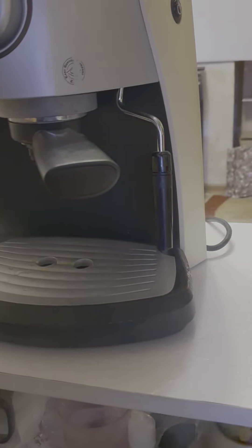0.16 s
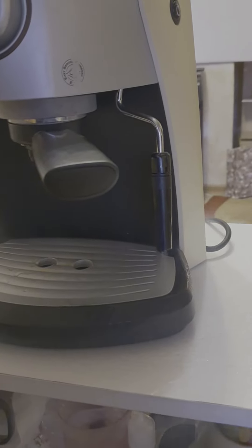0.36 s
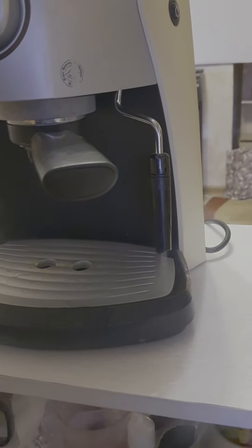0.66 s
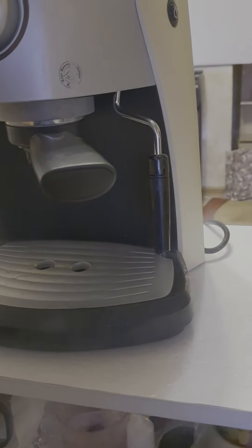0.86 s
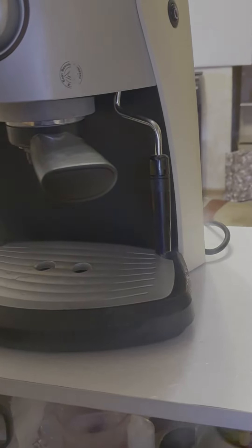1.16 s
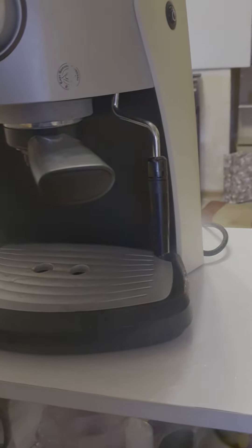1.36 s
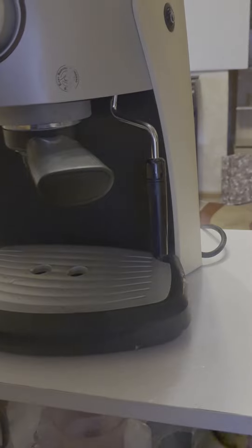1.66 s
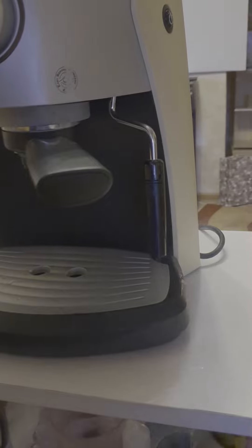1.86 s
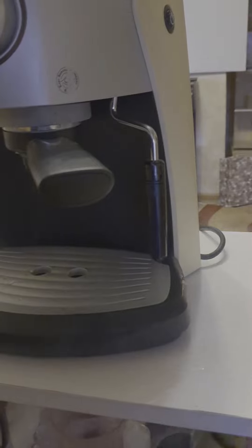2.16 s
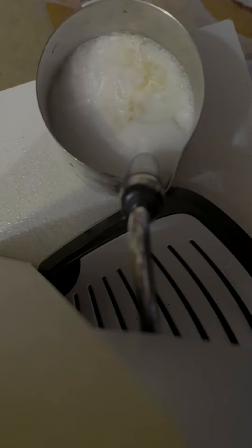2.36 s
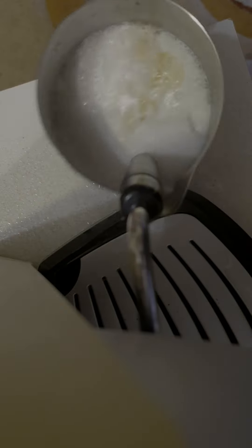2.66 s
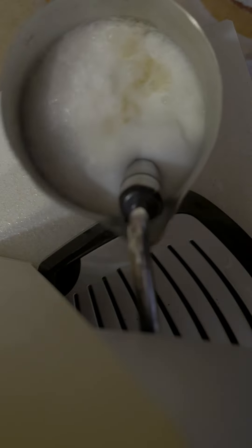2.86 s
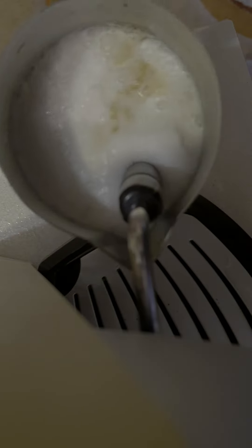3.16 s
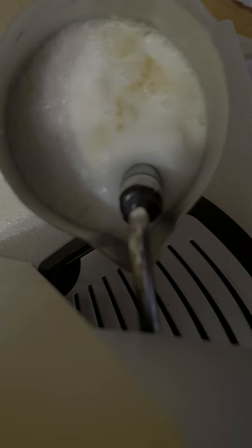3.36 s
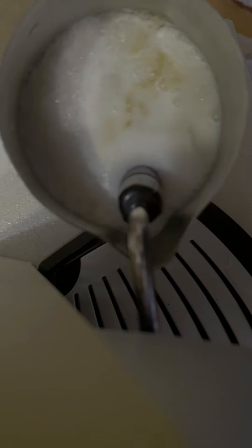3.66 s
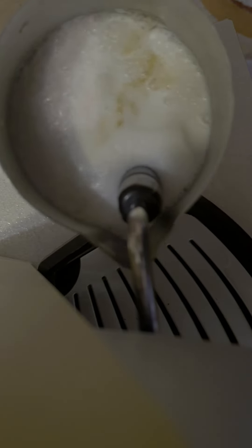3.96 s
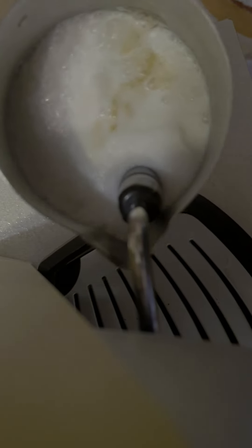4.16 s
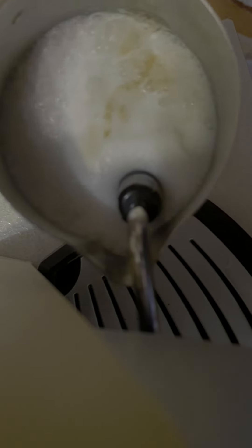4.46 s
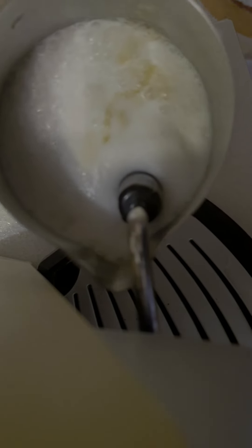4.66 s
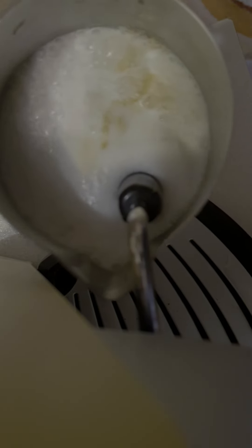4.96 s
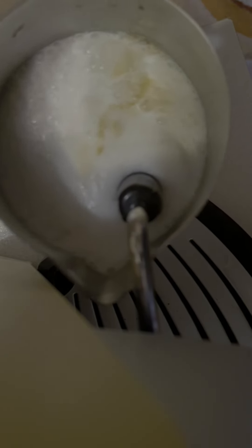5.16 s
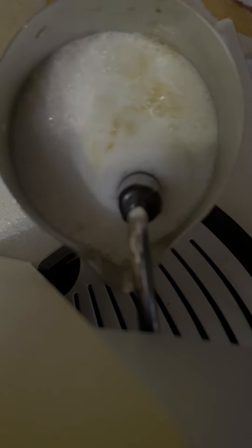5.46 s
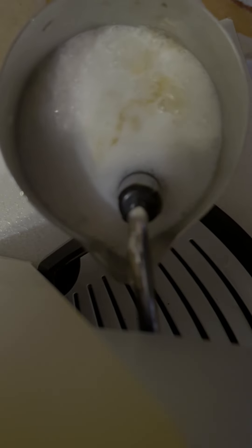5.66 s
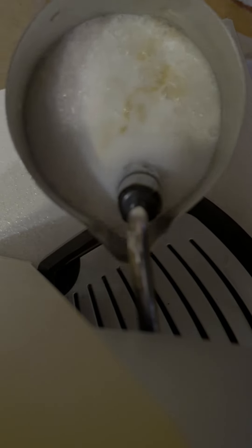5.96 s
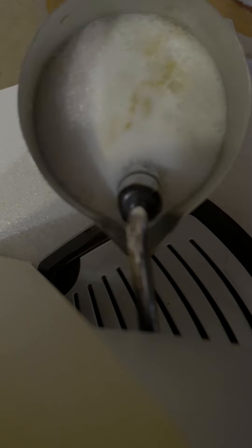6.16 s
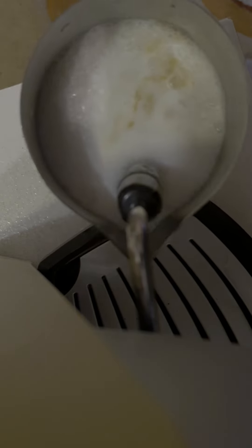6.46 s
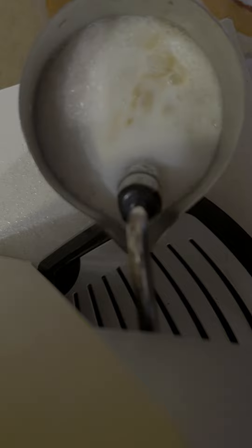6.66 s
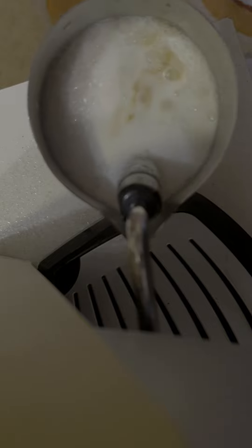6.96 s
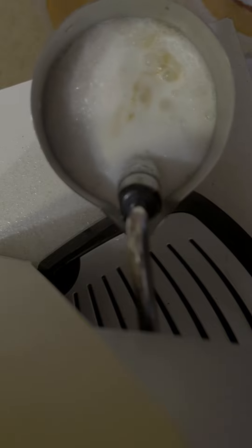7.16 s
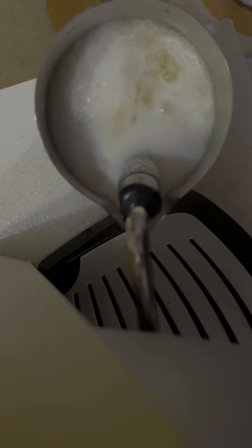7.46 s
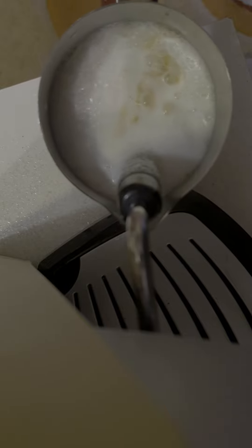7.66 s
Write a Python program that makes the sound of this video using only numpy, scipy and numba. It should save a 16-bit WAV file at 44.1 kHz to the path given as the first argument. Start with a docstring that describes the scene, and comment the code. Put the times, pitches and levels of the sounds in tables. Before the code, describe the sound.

In a home kitchen, an espresso machine's steam wand blows a loud, sputtering hiss into the air, then breaks off suddenly. A metal pitcher scuffs and knocks softly into place. The steam starts again inside the milk with a short tearing slurp and a few high squeaks, then settles into a hollow, bubbling rumble with irregular pops and faint fizz, all heard close up.

```python
"""Steaming milk in a home kitchen.

An espresso machine's steam wand blows a turbulent jet into open air, and the sound breaks off.
Then a steel pitcher is knocked into place and the valve opens. The tip tears air into the surface,
squeaks a few times and sinks, while condensing steam bubbles collapse in the milk with a hollow rumble."""
import sys
import numpy as np
from scipy import signal
from scipy.fft import rfft, irfft
from scipy.io import wavfile
from numba import njit

SR = 44100
rng = np.random.default_rng(int(sys.argv[2]) if len(sys.argv) > 2 else 0)


def file_out(sig):
    """Save sig as 16-bit WAV at sys.argv[1]."""
    # one column per channel
    cols = np.atleast_2d(sig).T
    # limit, then scale
    lim = np.clip(cols, -1, 1)
    pcm = np.round(lim * 32767).astype(np.int16)
    wavfile.write(sys.argv[1], SR, pcm)


N = 344862
T = np.arange(N) / SR
HZ = np.maximum(np.fft.rfftfreq(N, 1 / SR), 1)
JET_END_S, PITCHER_SCENE_S, VALVE_S = 2.272, 2.388, 3.45
TEAR_S, TEAR_LENGTH_S, SINK_S = 3.655, 0.43, 4.3

# Implosions of the largest steam bubbles: start_s, level_db, pitch_hz
COLLAPSES = [(3.487, -5.5, 965), (3.53, -17, 1050), (3.576, -16, 452), (3.598, -13.5, 780),
             (3.641, -13.5, 470), (4.365, -12, 700), (4.513, -7, 1034), (4.586, -5, 631), (4.665, -5, 678),
             (4.721, -8, 845), (4.961, -5, 850), (4.999, -5.5, 777), (5.098, -13, 840), (5.19, -3, 823),
             (5.476, -5, 814), (5.514, -4.5, 1000), (5.535, -3, 810), (5.597, -15, 760), (5.651, -17, 760),
             (5.71, -11.5, 723), (5.998, -5.5, 1097), (6.162, -8.5, 980), (6.25, -13, 810),
             (6.289, -5.5, 870), (6.298, -5.5, 965), (6.615, -11, 935), (7.234, -14, 707),
             (7.79, -17.5, 530)]


def amp(db):
    """Decibels to amplitude ratio."""
    return 10 ** (np.asarray(db) / 20)


def rms_one(x):
    """Normalise to unit rms."""
    return x / np.sqrt(np.mean(x ** 2) + 1e-20)


def at_hz(points):
    """Interpolate a table over log frequency at every bin."""
    hz, value = np.transpose(points)
    return np.interp(np.log(HZ), np.log(np.maximum(hz, 1)), value)


def drift(rate_hz):
    """Random modulation: low-passed noise of unit spread."""
    r = np.exp(-80 * np.pi * rate_hz / SR)
    slow = signal.lfilter([1], [1, -2 * r, r * r], rng.standard_normal(N // 40 + 2002))[2000:]
    return np.interp(np.arange(N) / 40, np.arange(len(slow)), rms_one(slow))


def coloured(x, gain):
    """Spectral shaping to unit rms."""
    return rms_one(irfft(rfft(x) * gain, N))


def lumpy_noise(spread_db, rate_hz):
    """White noise under random amplitude modulation."""
    return rng.standard_normal(N) * amp(spread_db * drift(rate_hz))


def highpass(x, hz):
    """Second-order roll-off below hz."""
    return signal.sosfilt(signal.butter(2, hz, "high", fs=SR, output="sos"), x)


def burst(start_s, length_s, attack_s, t60_s):
    """Envelope: linear rise, hold, exponential decay."""
    decay = amp(-60 * np.maximum(T - start_s - length_s, 0) / t60_s)
    return np.clip((T - start_s) / attack_s, 0, 1) * decay


def ring(drive, hz, t60_s):
    """Damped resonator: a unit impulse starts a sine of height 1."""
    r, w = amp(-60 / (t60_s * SR)), 2 * np.pi * hz / SR
    return signal.lfilter([0, np.sin(w)], [1, -2 * r * np.cos(w), r * r], drive + 1e-18)


@njit
def moving_ring(x, cos_w, r):
    """Two-pole resonator with a moving centre frequency."""
    y = np.zeros(len(x))
    for i in range(2, len(x)):
        y[i] = x[i] - x[i - 2] + 2 * r * cos_w[i] * y[i - 1] - r * r * y[i - 2]
    return y


def stereo_field(x, phase, balance, coherence):
    """Direct and diffuse sound at two microphone ports; the reflections shift as the microphone sways."""
    hz, lead = np.transpose(phase)
    share = np.clip(at_hz(coherence), 0, 1)
    bands_hz = np.arange(0, SR, 60)
    lags_s = 0.014 * rng.random((4, len(bands_hz)))   # each band returns with its own delay
    turn = np.cumsum([np.interp(HZ, bands_hz, lag) for lag in lags_s], axis=1) * 2 * np.pi * SR / N
    scatter = np.exp(-1j * turn).reshape(2, 2, -1)
    spectrum = rfft(x) * amp(at_hz(balance) * [[.5], [-.5]])
    port_phase = [np.ones(len(HZ)), np.exp(-1j * np.interp(HZ, hz, lead))]
    direct = irfft(spectrum * np.sqrt(share) * port_phase, N)
    here, there = irfft(spectrum * np.sqrt(1 - share) * scatter, N)
    sway = 3.02 * np.array([drift(3.3), drift(4.26)])
    return direct + np.cos(sway) * here + np.sin(sway) * there


def steam_jet():
    """Turbulent noise filtered by cavity resonances; water drops make the middle range sputter."""
    # Jet spectrum: frequency_hz, level_db
    colour = [(40, -47.5), (236, -18.5), (399, -17), (452, -21), (625, -8), (1500, -4.5), (2940, -1.5),
              (3250, -7.5), (4730, -1.5), (5780, -9), (8410, -7.5), (11900, -1.5), (15700, -7.5)]
    # Nozzle and drip tray resonances: centre_hz, width_hz, level_db
    cavities = [(1790, 130, -6), (4930, 60, -7), (5315, 85, -5), (10650, 250, -8.5), (11790, 110, -2.5),
                (15520, 250, 2.5)]
    # Drops flashing to steam: start_s, level_db
    spurts = [(0.043, 5.5), (0.101, 7.5), (0.256, 7.5), (0.6674, 8), (0.7094, 4.5), (0.842, 7.5),
              (1.046, 6.5), (1.085, 5), (1.123, 4.5)]
    peaks = sum(amp(db) ** 2 / (1 + (2 * (HZ - hz) / width) ** 2) for hz, width, db in cavities)
    gain = amp(at_hz(colour)) * np.sqrt(1 + 9.3 * peaks)
    wet = 1 / (1 + (HZ / 6000) ** 4) / (1 + (900 / HZ) ** 2)
    level = amp(2.1 * np.clip(drift(140), 0, 2) ** 2)
    for s, db in spurts:
        level += amp(db) * np.exp(-((T - s - .006) / 0.0021) ** 2)
    sputter = rms_one(rng.standard_normal(N) * level)
    hiss = rms_one(lumpy_noise(0.86, 40))
    mix = np.sqrt(wet) * rfft(sputter) + np.sqrt(1 - wet) * rfft(hiss)
    return amp(-15) * rms_one(irfft(mix * gain, N))


def room_tone():
    """Steady low background noise, uncorrelated between the channels."""
    # Background spectrum: frequency_hz, level_db
    colour = [(20, -19), (83, -3.5), (104, -25), (395, -18), (618, -26.5), (15700, -64)]
    return amp(-58.5) * coloured(rng.standard_normal((2, N)), amp(at_hz(colour)))


def scuffing(colour):
    """Friction noise and damped bumps as a hand shuffles the pitcher, with a faint hiss."""
    # Sliding contacts: start_s, length_s, level_db, bump_hz
    scuffs = [(2.45, .04, -59, 414), (2.551, 0.051, -45, 446), (2.624, 0.014, -44, 186),
              (2.684, 0.027, -46.5, 360), (2.721, 0.051, -44, 335), (2.982, 0.014, -51, 400),
              (3.208, 0.059, -48, 670)]
    friction = coloured(lumpy_noise(2.5, 60), colour)
    level, bumps = amp(-65) * (T > PITCHER_SCENE_S), 0
    for s, length_s, db, hz in scuffs:
        level += amp(db) * burst(s, length_s, 0.024, 0.098)
        bumps += amp(db + 13.5) * burst(s, 0, 0.01189, 0.13) * rms_one(ring(friction, hz, 0.036))
    hiss = coloured(lumpy_noise(2.7, 6), HZ / (1 + (HZ / 3000) ** 3))
    fade_in = np.clip((T - PITCHER_SCENE_S) / 0.33, 0, 1) ** 2
    return highpass(bumps, 170) + level * friction + amp(-69.5) * fade_in * hiss


def knocking(colour):
    """Impacts excite the pitcher's milk-damped modes; each grates in, cracks dully and ticks."""
    # Pitcher striking the machine: time_s, level_db, brightness_hz
    knocks = [(2.731, -40.5, 2590), (2.797, -37, 308), (3.25, -26.5, 1360)]
    # Pitcher modes: pitch_hz, level_db, t60_s
    modes = [(287, -1, 0.28), (318, 0, 0.13), (902, 9.5, 0.061), (1326, 0, 0.065), (2290, -14, 0.059)]
    times_s, db, bright_hz = np.transpose(knocks)
    at, ringing, contact = np.round(times_s * SR).astype(int), 0, 0
    for hz, mode_db, t60_s in modes:
        impulses = np.zeros(N)
        impulses[at] = amp(db + mode_db + rng.normal(0, 2.3, len(at))) / (1 + (hz / bright_hz) ** 2)
        ringing += ring(impulses, hz, t60_s)
    dull, sharp = (coloured(rng.standard_normal(N), colour * HZ ** tilt) for tilt in (.3, .9))
    for s, size in zip(times_s, amp(db + 5.5) * bright_hz / 2000):
        gap_s = np.abs(T - s)
        crack = np.where(T < s, 0.45 * np.exp(-gap_s / 0.016), np.exp(-gap_s / 0.018))
        tick = amp(3) * np.exp(-gap_s / 0.0026)
        contact += size * (crack * dull + tick * sharp)
    return highpass(ringing, 170) + contact


def whistle():
    """A faint pure tone in a wavering downward glide."""
    # Glide: start_s, length_s, pitch_hz, sag_hz_per_s, level_db
    glides = [(2.81, 0.11, 3897, 1500, -76)]
    out, waver = 0, amp(0.05 * drift(152))
    for s, length_s, hz, sag, db in glides:
        phase = 2 * np.pi * np.cumsum((hz - sag * (T - s)) * waver) / SR
        out += amp(db) * burst(s, length_s, 0.027, .2) * np.sin(phase)
    return out


def valve(attack_s):
    """Steam flow rises from 0 to 1 as the valve opens."""
    return np.clip((T - VALVE_S) / attack_s + 0.5, 0, 1) ** 2


def slosh():
    """Bulk motion of the milk gives uneven noise near 70 Hz."""
    return amp(-58.5) * coloured(lumpy_noise(6.3, 33), HZ ** 2 / (1 + (HZ / 70) ** 4)) * valve(0.045)


def milk_resonances():
    """Centre frequency and gain of three resonances of the bubbly milk."""
    # Lower two resonances: time_s, deep_db, middle_hz, middle_db
    lower = [(3.45, -40, 456, -45), (3.62, -31, 427, -27.5), (3.72, -58, 422, -33), (4.04, -51, 415, -32),
             (4.12, -28, 443.6, -26.5), (4.6, -20, 476, -23.5), (5.2, -24, 436, -20.5),
             (5.8, -29, 372, -27), (6.4, -32.5, 326, -35), (6.95, -40.5, 426, -31.5),
             (7.82, -70, 380.5, -29)]
    # Surges of the upper one, which start high and sag: start_s, length_s, pitch_hz, level_db
    surges = [(3.571, 0.021, 807, -26), (4.41, 0.35, 1006, -20.5), (4.84, 0.9, 807, -20),
              (5.939, 0.74, 1173, -22.5), (6.838, 0.56, 1080, -25), (7.441, 0.35, 920, -26.5)]
    times_s, *columns = np.transpose(lower)
    deep_db, middle_hz, middle_db = (np.interp(T, times_s, column) for column in columns)
    climb_hz = 125 + 440 * np.maximum(T - VALVE_S, 0)   # the wand clears
    sink_hz = 391.4 * 2 ** (-np.maximum(T - 4.015, 0) / 2.9)   # the foam grows
    deep_hz = np.minimum(climb_hz, sink_hz)
    upper_hz = rest_hz = 750
    upper_gain = amp(-35.5)
    for s, length_s, hz, db in surges:
        upper_hz += (hz - rest_hz) * (T > s) * np.exp(-np.abs(T - s) / 0.22)
        upper_gain = np.maximum(upper_gain, amp(db) * burst(s, length_s, 0.014, 1))
    return (deep_hz, amp(deep_db)), (middle_hz, amp(middle_db)), (upper_hz, upper_gain)


def rumble():
    """Shot noise: steam bubbles implode in clumps and drive the resonances of the milk."""
    sizes = amp(3 * np.minimum(rng.exponential(1, N), 3)) * rng.choice([-1, 1], N)
    pops = sizes * (rng.random(N) < 450 * amp(3 * drift(60)) / SR)
    out = 0
    for (hz, gain), width_hz in zip(milk_resonances(), (42.7, 100, 320)):
        drive = rms_one(pops) + 0.26 * rng.standard_normal(N)
        wander = amp(width_hz / 558 * drift(59))   # each clump has its own size
        cos_w = np.cos(2 * np.pi * hz * wander / SR)
        r = np.exp(-np.pi * width_hz / SR)
        out += gain * rms_one(moving_ring(moving_ring(drive, cos_w, r), cos_w, r))
    # The rumble thins while a big bubble grows.
    lull = sum(np.exp(-((T - s) / 0.0052 + 1) ** 2) for s, _, _ in COLLAPSES)
    return out * valve(.035) * amp(-4.5 * lull)


def fizz():
    """Fine bubbles make noise lifted by wall resonances, brighter until the tip has sunk."""
    # Fizz spectrum: frequency_hz, level_db
    colour = [(710, -27.5), (1200, -1), (1650, -11), (2400, -23), (2900, -25), (3560, -32.5), (5130, -30),
              (8000, -45), (10400, -105)]
    # Pitcher wall resonances: centre_hz, width_hz, lift_db
    wall_modes = [(1473, 52, 3), (2840, 30, 9.5), (4234, 140, 4)]
    # Spectrum of the highest hiss: frequency_hz, level_db
    treble_colour = [(6000, -30), (9500, -10.5), (12000, 0)]
    wall = 1 + sum((amp(db) - 1) / (1 + (2 * (HZ - hz) / width) ** 2) for hz, width, db in wall_modes)
    gain = wall * amp(at_hz(colour))
    deep = amp(-35) * coloured(lumpy_noise(1.8, 40), gain)
    treble = coloured(lumpy_noise(1.8, 30), amp(at_hz(treble_colour)))
    shallow = amp(-34.5) * coloured(lumpy_noise(2.1, 110), gain * HZ ** 0.69)
    near_surface = burst(VALVE_S, SINK_S - VALVE_S, .01, 0.99)
    swell = np.clip((T - VALVE_S) / 0.32, 0, 1)
    # The treble peaks with the tearing, then settles.
    settling = np.exp(-np.maximum(T - TEAR_S - TEAR_LENGTH_S, 0) / 0.53)
    treble_gain = amp(-59 + 16 * settling) * np.clip((T - VALVE_S) / 0.41, 0, 1) ** 2
    return swell * (deep + near_surface * shallow) + treble_gain * treble


def collapses():
    """A big bubble implodes: a noisy snap, then a few heavily damped cycles."""
    out, t = np.zeros(N), T[:2000]
    grit = coloured(rng.standard_normal(N), HZ / (1 + (HZ / 1500) ** 3))
    for s, db, hz in COLLAPSES:
        i, age = round(s * SR), t * hz / 1.1
        pulse = amp(db) * np.e * age * np.exp(-age) * np.sin(2 * np.pi * hz * t)
        snap = amp(db - 32.5) * np.exp(-t / 0.001)
        out[i:i + len(t)] += pulse[:N - i] + snap[:N - i] * grit[i:i + len(t)]
    return highpass(out, 200)


def tearing():
    """Air entrainment: the tip rips the surface and gulps pockets of air that ring briefly."""
    # Tearing spectrum: frequency_hz, level_db
    colour = [(700, -24.5), (1240, 6), (1610, 2.5), (2250, 0), (2700, -8), (6650, -17.5), (9300, -34.5),
              (15700, -38.5)]
    # Air pockets: time_s, level_db, pitch_hz
    pockets = [(3.673, -21, 1536), (3.728, -17, 2200), (3.766, -11, 1329), (3.769, -13.5, 2266),
               (3.799, -19, 2052), (3.838, -7, 1250), (3.887, -15, 2220)]
    gulps = sum(amp(db) * np.exp(-((T - s) / 0.0034) ** 2) * np.sin(2 * np.pi * hz * T)
                for s, db, hz in pockets)
    level = burst(TEAR_S, TEAR_LENGTH_S, 0.047, 0.25) * amp(-22.5 - 8 * (T - TEAR_S))
    return level * coloured(lumpy_noise(3, 150), amp(at_hz(colour))) + gulps


def squeaks():
    """Flow-induced oscillation: a milk film across a steam hole sounds a tone, its octave and spray."""
    # Squeaks at the tip: start_s, length_s, from_hz, to_hz, level_db
    glides = [(4.078, 0.039, 8900, 8900, -36), (4.109, 0.021, 7900, 7540, -37),
              (4.396, 0.0057, 5400, 5390, -28.5), (4.422, .011, 7240, 7640, -31.5),
              (4.437, 0.021, 8700, 8000, -38), (4.453, 0.04, 7550, 7030, -37.5),
              (4.792, 0.042, 8740, 9100, -49.5)]
    out, waver = 0, amp(0.2 * drift(400))
    roughness = amp(4 * drift(250))
    spray = amp(-7) * coloured(rng.standard_normal(N), HZ)
    for s, length_s, from_hz, to_hz, db in glides:
        pitch_hz = np.interp(T, [s, s + length_s], [from_hz, to_hz]) * waver
        phase = 2 * np.pi * np.cumsum(pitch_hz) / SR
        out += amp(db) * burst(s, length_s, 0.0064, 0.037) * (np.sin(phase) + np.sin(2 * phase) + spray)
    return roughness * out


def scene():
    """Superposition in stereo: jet and handling to the right, the milk mostly to the left."""
    # Phase differences between the ports: frequency_hz, left_lead_rad
    jet_phase = [(0, -6), (5000, 1), (7600, 1.5), (9300, 5), (10800, 1), (12200, 5.5), (14500, 0.5),
                 (15300, -3)]
    pitcher_phase = [(0, 2.8), (150, 0.61), (520, 3.75), (1720, 4.08), (3000, 7.6), (16000, 63)]
    # Level differences: frequency_hz, left_minus_right_db
    jet_balance = [(60, -2.5), (550, -1), (1650, -4), (15000, -5)]
    hand_balance = [(1000, -4)]
    milk_balance = [(60, -18.5), (180, 5), (550, 9), (1650, 1), (15000, 3)]
    # Share of the power that arrives directly: frequency_hz, fraction
    jet_coherence = [(100, 1), (2500, 0.067), (4500, 0.41), (6500, 0.083), (8500, 0.91), (15000, 0.57)]
    pitcher_coherence = [(60, .5), (200, .9), (1300, .95), (2000, .45), (7000, .1)]
    # Spectrum of contact noise: frequency_hz, level_db
    contact_colour = [(80, -19.5), (180, -5), (450, 0), (1100, -6.5), (1700, -23.5), (4000, -41.5),
                      (9000, -69)]
    contact = amp(at_hz(contact_colour))
    milk = rumble() + collapses() + tearing() + fizz()
    background = room_tone() + slosh()
    handling = knocking(contact) + scuffing(contact) + whistle()
    handling = stereo_field(handling, pitcher_phase, hand_balance, pitcher_coherence)
    jet = stereo_field(steam_jet(), jet_phase, jet_balance, jet_coherence) * (T < PITCHER_SCENE_S)
    milk = stereo_field(milk, pitcher_phase, milk_balance, pitcher_coherence)
    return jet + handling + milk + squeaks() * amp([[2.5], [-2.5]]) + background


def record(dry):
    """A short silence parts the two scenes; saturation rounds the peaks and a low-pass cuts the top."""
    fall = amp(-np.maximum(T - JET_END_S, 0) * 2100)
    gate = np.where(T < PITCHER_SCENE_S, fall, 1)
    rounded = 1.5 * np.tanh(gate * dry / 1.5)
    return signal.sosfilt(signal.ellip(12, .5, 60, 15740, fs=SR, output="sos"), rounded)


dry = scene()
out = record(dry)
file_out(out)
```